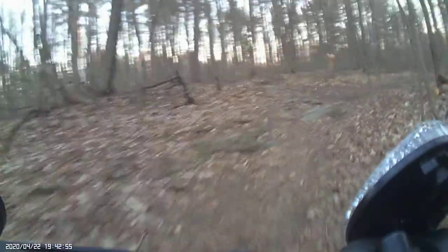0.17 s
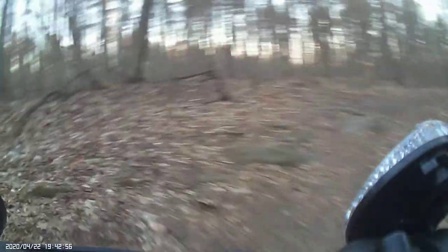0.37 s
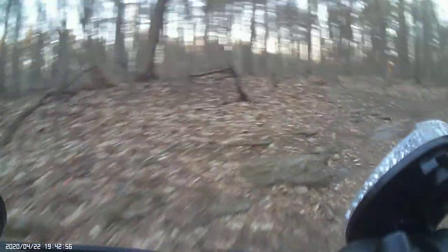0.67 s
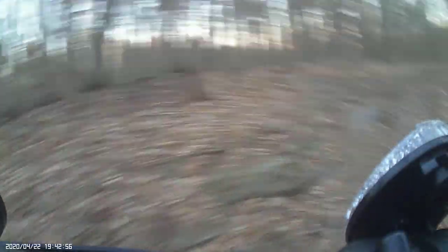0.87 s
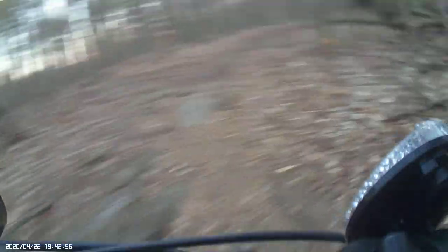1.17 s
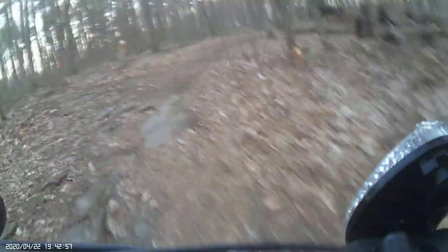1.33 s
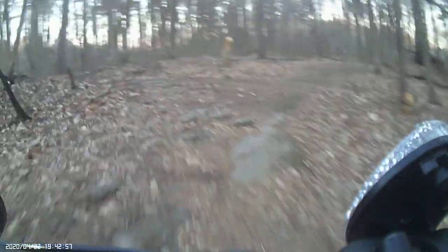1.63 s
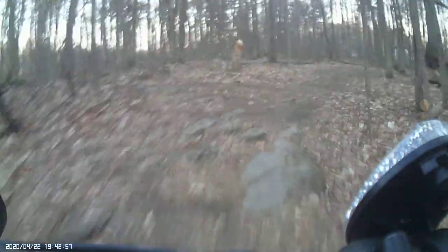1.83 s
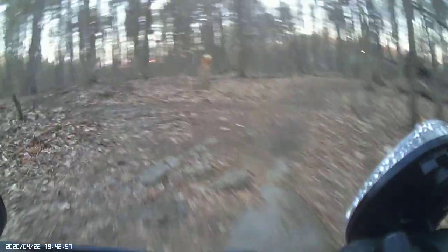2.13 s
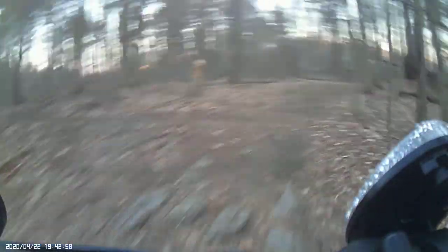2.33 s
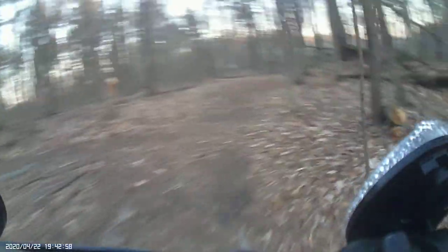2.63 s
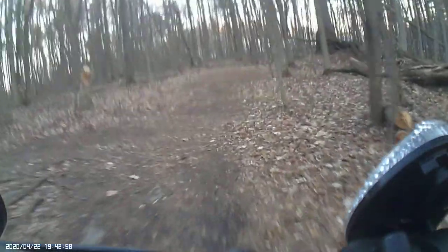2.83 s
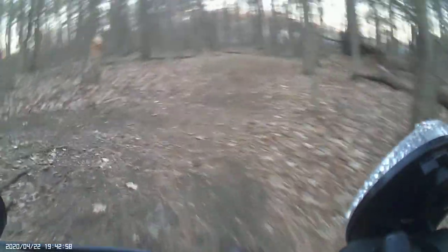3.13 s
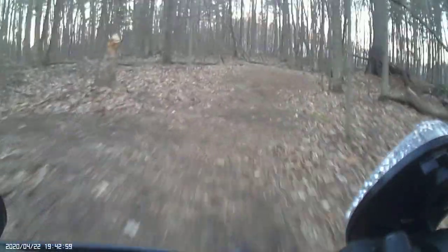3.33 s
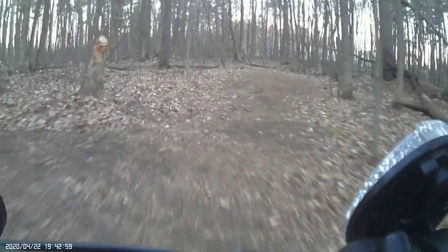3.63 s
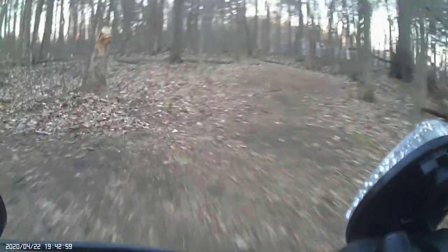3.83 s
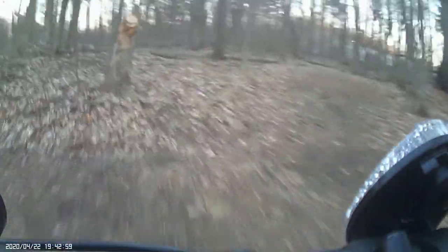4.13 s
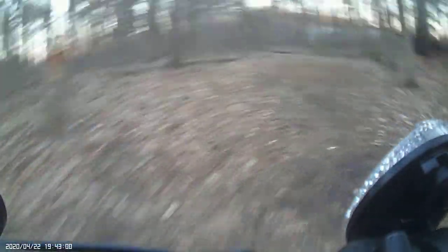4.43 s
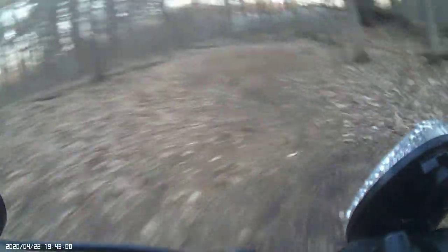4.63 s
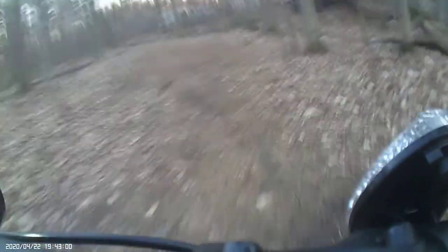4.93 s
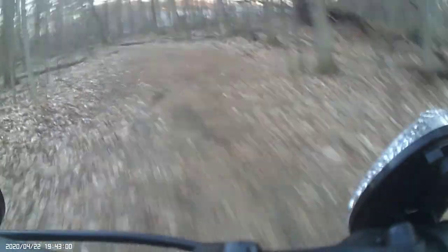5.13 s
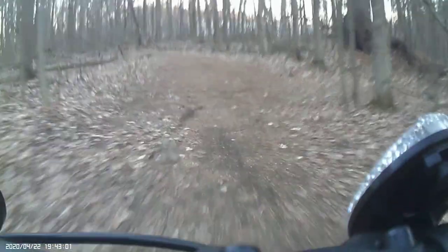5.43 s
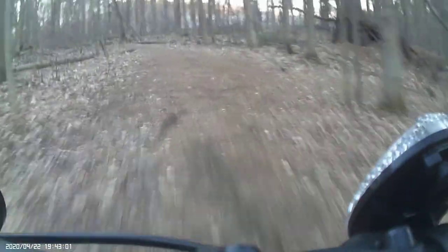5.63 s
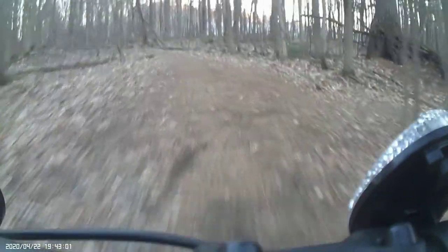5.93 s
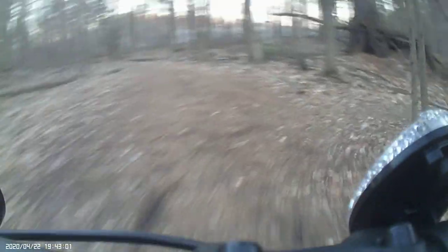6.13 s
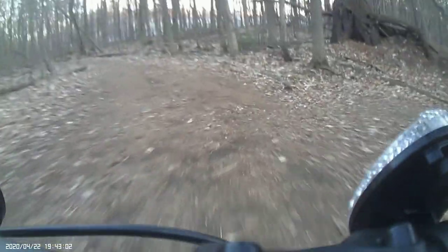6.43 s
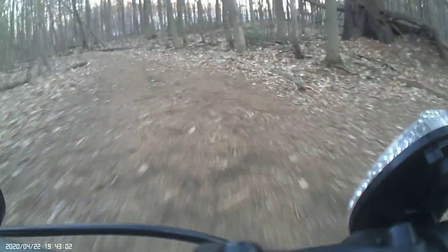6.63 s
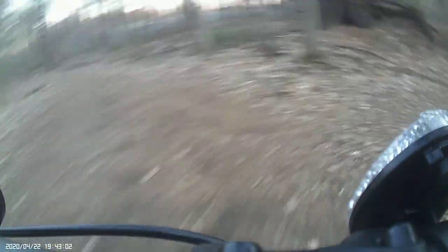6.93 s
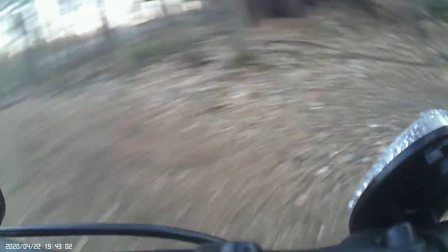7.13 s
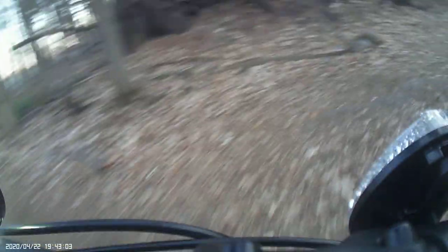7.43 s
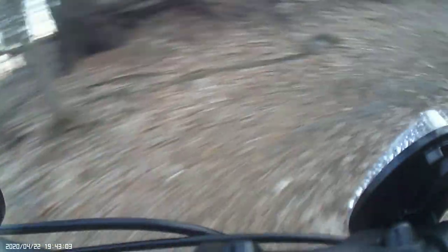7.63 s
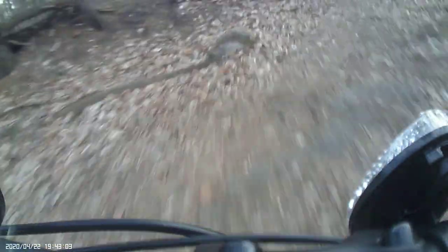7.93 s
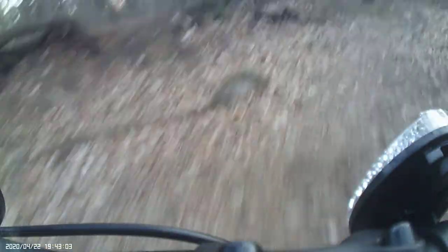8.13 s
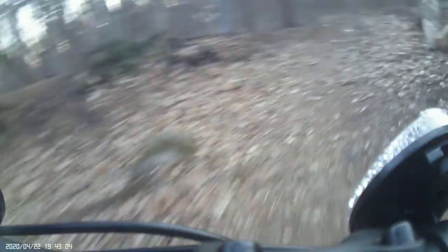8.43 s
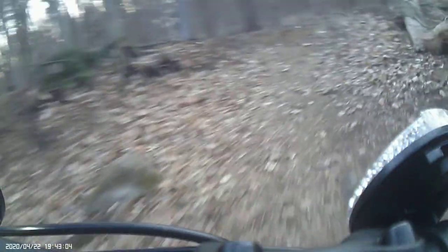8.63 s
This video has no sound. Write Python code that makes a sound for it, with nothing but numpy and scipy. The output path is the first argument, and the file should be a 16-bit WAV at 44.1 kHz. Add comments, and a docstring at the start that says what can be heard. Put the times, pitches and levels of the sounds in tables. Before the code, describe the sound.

A mountain bike rattles down a rough leafy trail, with low rumble, clacks and thumps, then brake groans, squeals and freewheel clicks.

```python
"""A drumming rush and low rumble under clacks, ticks and thumps: a mountain bike on a rough, leafy trail.
It is heard from a camera on the handlebar. Shaped noise makes the wind, tyres and grit; bursts ring modes
for the loose parts, chain and pings; damped swings make the thumps of stones and roots.
A joint squeaks early on. Later the freewheel clicks and a disc brake scrapes, groans, hums and squeals:
timed noise bursts click, grains scrape, wandering sines groan, gliding sines squeak and squeal."""
import sys
import numpy as np
from scipy import signal
from scipy.fft import rfft, irfft, next_fast_len
from scipy.io import wavfile
from scipy.ndimage import uniform_filter1d, map_coordinates

SR = 44100
rng = np.random.default_rng(int(sys.argv[2]) if len(sys.argv) > 2 else 0)


def log_audio(samples):
    """Write samples as a 16-bit WAV file to the path given in sys.argv[1]."""
    # one column per channel
    frames = np.atleast_2d(samples).T
    # limit to full scale, then quantise
    limited = np.clip(frames, -1, 1)
    pcm = np.round(limited * 32767).astype(np.int16)
    wavfile.write(sys.argv[1], SR, pcm)


N = 387638
TIME = np.arange(N) / SR  # seconds, whole scene
HIT = np.arange(SR // 5) / SR  # seconds, one hit
TOP_HZ = 15850  # upper band limit
MOUNT_HZ = 65  # the mount's resonance, also the highest rebound pitch of a bump


def amp(db):
    """Logarithmic level: decibels to gain."""
    return 10 ** (np.asarray(db) / 20)


def unit(x):
    """Power normalisation: x at rms 1."""
    return x / np.sqrt(np.mean(x ** 2) + 1e-20)


def crest(x):
    """Short-time power normalisation: the loudest 3 ms of a hit have rms 1."""
    power = uniform_filter1d(x ** 2, size=132)
    return x / np.sqrt(power.max() + 1e-20)


def peaked(x):
    """Peak normalisation: a hit scaled to peak 1."""
    return x / np.abs(x).max()


def curves(rows):
    """Linear interpolation in time: one value per sample for each column after the first."""
    s, *columns = np.transpose(rows)
    return [np.interp(TIME, s, column) for column in columns]


def during(rows):
    """Gating: a soft-edged window over the time that a table spans."""
    inside = (TIME > rows[0][0]) & (TIME < rows[-1][0])
    return uniform_filter1d(1. * inside, size=256)


def wobble(rate):
    """Slow random modulation: a smooth curve through rate random knots a second."""
    knots = rng.standard_normal(N // 20)
    return map_coordinates(knots, [TIME * rate], order=3, mode="wrap")


def filtered(x, response):
    """Linear filtering: the spectrum of x times a response of frequency."""
    m = next_fast_len(len(x) + 8192)
    spectrum = rfft(x, m) * response(np.fft.rfftfreq(m, 1 / SR))
    return irfft(spectrum, m)[:len(x)]


def colour(points):
    """Spectral envelope: the response through (Hz, dB) points on a log axis."""
    f, db = np.transpose(points)
    return lambda hz: amp(np.interp(np.log(hz + 1), np.log(f), db))


def modes(rows):
    """Modal superposition: the causal response of (Hz, width Hz, dB) resonances."""
    return lambda f: sum(amp(db) * 1j * f * w / (c * c - f * f + 1j * f * w) for c, w, db in rows)


def noise(response):
    """Filtered random excitation: coloured noise of rms 1."""
    return unit(filtered(rng.standard_normal(N), response))


def burst(t60):
    """Exponential decay: a chattering contact as noise that falls 60 dB in t60 seconds."""
    return rng.standard_normal(len(HIT)) * amp(-60 * HIT / t60)


def band(x, lo_hz, hi_hz):
    """Band limitation: a causal band-pass."""
    edges = [lo_hz, min(hi_hz, SR / 2 - 1)]
    return signal.sosfilt(signal.butter(3, edges, "band", fs=SR, output="sos"), x)


def add(track, s, sound):
    """Linear superposition: mix a sound into the track at s seconds."""
    part = track[max(round(s * SR), 0):][:len(sound)]
    part += sound[:len(part)]


def grains(rate, spread_db):
    """Random impact train: tiny impacts of uneven size, on average rate a second, rms 1."""
    struck = rng.random(N) < rate / SR
    size = rng.standard_normal(N) * amp(spread_db * rng.standard_normal(N))
    return unit(struck * size)


def sway(hz, drift_hz, rate, flutter_db):
    """Unevenly driven resonance: a sine whose pitch and size wander, rms 1."""
    phase = 2 * np.pi * np.cumsum(hz + drift_hz * wobble(rate)) / SR
    return unit(np.sin(phase) * amp(flutter_db * wobble(rate)))


# Wind on the case. Each row: time in seconds, level in dB before the gusts.
WIND_LEVEL = [(0, -29), (1, -35), (1.8, -32.5), (2.3, -29.5), (2.9, -27.5), (3.8, -27), (4.1, -23),
              (5.3, -20.5), (5.5, -27.5), (6, -24.5), (6.3, -31), (7.9, -37), (8.25, -24), (8.52, -44),
              (8.79, -29)]
# Spectrum of the wind. Each row: frequency in Hz, relative level in dB.
WIND_SPECTRUM = [(6, -14.5), (15, 5.5), (27, 2.5), (45, 3.5), (90, -13.5), (170, -28), (400, -21),
                 (1000, -120)]
# The camera shaking on its mount. Each row: time in seconds, level in dB before the swells.
SHAKE_LEVEL = [(0, -25), (.16, -36), (.42, -18), (.64, -48), (.92, -27), (1.45, -28), (1.66, -22.5),
               (2.06, -32), (2.2, -16.5), (2.37, -35), (2.47, -20.5), (2.92, -22), (3.65, -27.5),
               (3.95, -26), (4.08, -35), (4.21, -22.5), (4.53, -21), (5.42, -23), (5.54, -38),
               (5.68, -24.5), (6.17, -20.5), (6.26, -26.5), (6.85, -33.5), (6.95, -22), (7.4, -34),
               (7.62, -23.5), (7.95, -35.5), (8.3, -26.5), (8.79, -30)]


def rumble():
    """Turbulence and resonance: gusts buffet the case while the camera shakes on its springy mount."""
    gust_db = 3.5 * wobble(7.4)
    wind = amp(curves(WIND_LEVEL)[0] + gust_db) * noise(colour(WIND_SPECTRUM))
    swell_db = 0.66 * wobble(7.9)
    shake = sway(MOUNT_HZ, drift_hz=4.015, rate=22, flutter_db=3.5)
    return wind + amp(curves(SHAKE_LEVEL)[0] + swell_db) * shake


# Whine of the camera electronics. Each row: frequency in Hz, level in dB.
WHINE_TONES = [(7720, -85.5), (7782, -85.5), (7843, -63), (7903, -75), (7962, -77)]


def electronics():
    """Narrow-band tones over broadband noise: a thin steady whine and a faint hiss."""
    whine = sum(amp(db) * sway(hz, drift_hz=2.5, rate=15.0, flutter_db=1.5) for hz, db in WHINE_TONES)
    hiss = noise(colour([(1000, -4.5), (8800, -9.0), (10000, -7.5), (15500, -16.0)]))
    return whine + amp(-72.5) * hiss


# Tyres on the trail. Each row: time in seconds, tyre roll in dB, grit and leaves in dB,
# both before the weights of their parts.
ROLL_LEVEL = [(0, -31, -46.5), (.2, -37.5, -53), (.7, -39, -54), (.95, -37, -53.5), (1.27, -36.5, -56.5),
              (1.47, -34.5, -52), (1.85, -35, -51.5), (2.5, -33.5, -51.5), (3, -34.5, -52), (4.5, -34, -50),
              (4.95, -32.5, -49.5), (5.5, -31.5, -45), (6.05, -30.5, -54), (6.45, -26.5, -53),
              (6.6, -35, -53), (7.3, -30, -48.5), (7.8, -34.5, -53.5), (8.35, -31.5, -50),
              (8.6, -33.5, -51.5)]
# Spectrum of the rolling rush. Each row: frequency in Hz, relative level in dB.
ROLL_SPECTRUM = [(60, -35.5), (110, -45.5), (200, -27), (260, -21.5), (318, 7.5), (385, -26.5), (435, -5),
                 (465, -11.5), (570, 7), (770, -13.5), (920, -14), (1180, -15.5), (1860, -17), (2100, -28),
                 (4000, -61.5)]
# Spectrum of grit and leaves. Each row: frequency in Hz, relative level in dB.
GRIT_SPECTRUM = [(900, -44), (2000, 0.5), (2900, -2), (3500, 2.5), (5000, -20.5), (7000, -14),
                 (9000, -14.5), (10000, -31.5), (15500, -25.5)]
# Pebbles under the tread. Each row: time in seconds, level in dB relative to the roll.
PATTER_LEVEL = [(0, -4.5), (2, -6.5), (5.3, -11), (6.1, -17.5), (8.1, -6), (8.79, -19)]
# Modes of handlebar and camera case. Each row: frequency in Hz, width in Hz, relative level in dB.
BAR_MODES = [(305, 27, -22), (563.7, 47, 21), (835, 74, 9.5), (933, 316, 5), (1293, 116, 3), (1625, 124, 5),
             (1870, 39, -26.5), (2470, 510, -12.5), (2914, 220, 1.5), (3280, 110, -26), (3820, 180, -39),
             (4473, 147, -4), (4750, 89, -4.5), (5650, 210, -16.5), (6880, 400, -13), (7350, 400, -24)]


def tyres():
    """Structure-borne rolling noise: knobs and soil drum, pebbles patter, grit and dry leaves crackle."""
    roll_db, grit_db = curves(ROLL_LEVEL)
    lump_db = 2.0 * wobble(25)  # uneven soil, shared by the drumming and the grit
    pebbles = filtered(grains(rate=110, spread_db=3.0), modes(BAR_MODES[1:7]))
    patter = amp(curves(PATTER_LEVEL)[0]) * unit(band(pebbles, 390, 1650))
    rush = amp(1.0) * noise(colour(ROLL_SPECTRUM))
    roll = amp(roll_db + lump_db) * (patter + rush)
    crackle = grains(rate=450, spread_db=3.5) + amp(-9.5) * rng.standard_normal(N)
    ringing = unit(band(filtered(crackle, modes(BAR_MODES[7:])), 1600, 7600))
    grit = amp(-6.0) * ringing + amp(-6.0) * noise(colour(GRIT_SPECTRUM))
    return roll + amp(grit_db + lump_db) * grit


# The loose part's own ring. Each row: frequency in Hz, width in Hz, relative level in dB.
LOOSE_PART_MODE = [(1610, 190, 2)]


def clack(middle_db, ring_db, sharp_db):
    """Modal excitation by impact: a hard contact rings the low, middle and high modes of bar and case."""
    shift = 1 + 0.032 * rng.standard_normal(len(BAR_MODES))  # the modes scatter from blow to blow
    body = [(hz * k, width, level) for (hz, width, level), k in zip(BAR_MODES, shift)]
    contact = burst(0.0084) + amp(-1.5) * burst(0.035)  # one blow, then a short buzz
    rebound_s = 0.011 * rng.uniform(0.286, 1.0)  # the part falls back once, softer
    add(contact, rebound_s, amp(-17) * burst(0.0061))
    shudder = contact + amp(-13) * burst(0.11)  # the bar shudders on
    ring = crest(band(filtered(shudder, modes(body[1:3])), 428, 1110))
    middle_modes = modes([*body[2:7], *LOOSE_PART_MODE])
    middle = peaked(band(filtered(contact, middle_modes), 753, 1583))
    edge_modes = modes([*body[7:], (2200, 450, -1)])
    edge = crest(band(filtered(burst(0.019), edge_modes), 2100, 6100))
    return amp(ring_db - 1.5) * ring + amp(middle_db - 1.98) * middle + amp(sharp_db) * edge


# Loose parts striking the bar. Each row: start in seconds, middle modes in dB and low ring in dB
# (both before a small trim), high modes in dB.
CLACK_BLOWS = [(0.389, -20, -42, -51), (0.565, -26, -35.5, -46), (0.74, -37, -40, -51),
               (0.867, -16.5, -27, -38), (0.911, -20, -23, -51), (0.941, -16, -29, -41),
               (1.597, -17.5, -45, -59), (1.814, -10.5, -15, -33.5), (1.9742, -8, -21.5, -28),
               (2.008, -9.5, -18.5, -25), (2.048, -14, -31, -39), (2.116, -15.5, -33, -43),
               (2.1663, -11, -27.5, -35), (2.213, -18, -31, -44), (2.359, -23, -38, -38.5),
               (2.431, -16.5, -19.5, -38.5), (2.473, -13.5, -29, -39), (2.485, -11, -29, -37),
               (2.491, -15.5, -17, -26.5), (2.547, -5, -18, -26.5), (2.574, -9, -17.5, -27.5),
               (2.605, -19.5, -28, -56), (2.647, -17, -30, -56), (2.684, -19.5, -40, -42),
               (2.724, -18.5, -32, -44), (2.831, -21, -22, -47), (2.958, -17, -27, -57),
               (3.057, -12.5, -20.5, -38), (3.109, -14, -26, -42), (3.229, -12.5, -18, -38),
               (3.281, -14, -24, -43), (3.58, -21.5, -30, -41), (3.829, -24.5, -27, -35),
               (3.951, -15, -22, -36), (3.968, -13, -24, -54), (3.998, -15, -17.5, -32),
               (4.011, -8.5, -21, -39), (4.057, -12.5, -19.5, -29.5), (4.112, -14.5, -26, -33),
               (4.16, -17, -20.5, -39), (4.214, -17, -17.5, -47), (4.357, -10.5, -36, -35.5),
               (4.388, -15.5, -39, -41), (4.408, -28, -38, -41), (4.445, -10, -23, -29),
               (4.503, -22, -19, -39), (4.578, -9.5, -46, -39), (4.634, -6.5, -47, -31),
               (4.677, -10.5, -20.5, -34), (4.7, -14, -30, -36), (4.712, -17, -17, -55),
               (4.806, -25, -43, -52), (4.847, -7.5, -20, -24), (4.857, -14, -15, -40),
               (4.866, -21, -38, -26), (4.8997, -5, -14, -25.5), (4.909, -7, -14.5, -27),
               (4.916, -7, -11, -28), (4.932, -16, -21, -31), (4.941, -15, -27, -35), (4.966, -7, -21, -19),
               (4.976, -13, -16.5, -36), (5.03, -13, -27, -34), (5.092, -9, -23.5, -30),
               (5.102, -15.5, -28, -38), (5.135, -10.5, -15.5, -21.5), (5.146, -16, -11, -48),
               (5.181, -10.5, -23, -28), (5.187, -20, -26, -50), (5.198, -22, -30, -28),
               (5.208, -22, -15.5, -38), (5.216, -11, -14, -23.5), (5.25, -4, -15.5, -19.5),
               (5.297, -19, -25, -49), (5.312, -39, -42, -32.5), (5.578, -20.5, -13.5, -40),
               (5.623, -25, -31, -48), (5.638, -19, -38, -31), (5.662, -11, -24, -25.5),
               (5.678, -18, -19, -39), (5.714, -9, -15, -27), (5.725, -13, -27, -29),
               (5.736, -29, -20, -51), (5.807, -19.5, -19.5, -34), (5.89, -17.5, -19, -39),
               (6.088, -15, -30, -34), (6.145, -22, -27, -34), (7.009, -23.5, -33, -35),
               (7.386, -23, -35, -44), (8.301, -18.5, -19, -39.5), (8.325, -10, -22.5, -34),
               (8.342, -10, -21, -25), (8.4, -18, -32, -43), (8.426, -6.5, -16, -21)]
# Rattle of chain and loose parts on rough ground. Each row: time in seconds, reference level in dB.
RATTLE_LEVEL = [(0, -56), (.8, -83), (1.25, -77), (2, -62), (3.5, -59.5), (4.8, -52), (5.3, -56),
                (5.45, -68), (5.9, -66), (6.3, -59), (7.5, -72), (8.1, -67), (8.79, -69)]


def clacks():
    """Repeated impact: loose parts strike the bar; small clacks come at random on rough ground."""
    out = np.zeros(N)
    for s, middle_db, ring_db, sharp_db in CLACK_BLOWS:
        add(out, s, clack(middle_db, ring_db, sharp_db))
    contacts = signal.fftconvolve(grains(rate=20, spread_db=0.5), burst(0.048))[:N]
    small = unit(band(filtered(contacts, modes(BAR_MODES[1:7])), 600, 1900))
    return out + amp(curves(RATTLE_LEVEL)[0] + 8) * small


def tick():
    """Clustered impacts: a few chain links land one after another, at a scattered pitch; peak 1."""
    hz = 5730 * np.exp(0.17 * rng.standard_normal())
    links = burst(0.019) * (1 - np.exp(-HIT / 0.00053))
    return peaked(band(filtered(links, modes([(hz, 1200, 0)])), 2700, 8400))


# Further slaps of the chain on the frame. Each row: start in seconds, peak in dB before the sizzle.
CHAIN_SLAPS = [(0.2009, -34.5), (0.2438, -44), (0.5197, -35.5), (1.1014, -43), (1.488, -46), (1.7519, -47),
               (1.813, -39), (1.863, -36), (1.9111, -31.5), (1.974, -40), (1.995, -32), (2.0073, -25),
               (2.289, -39), (2.5222, -27.5), (2.697, -39.5), (2.752, -36), (2.767, -37.5), (2.779, -32.5),
               (2.9147, -28.5), (3.19, -33), (3.2495, -27), (3.651, -41), (3.83, -39.5), (3.939, -29),
               (3.981, -28), (4.129, -37), (4.305, -33.5), (4.353, -30), (4.379, -28.5), (4.541, -35),
               (4.597, -28.5), (4.723, -31), (4.768, -25.5), (4.808, -32), (4.8281, -26.5), (4.86, -28),
               (4.9154, -22.5), (4.967, -26), (5.064, -28.5), (5.1716, -30), (5.199, -35), (5.228, -20.5),
               (5.26, -24.5), (5.2834, -27), (5.3113, -24), (5.325, -29), (5.6261, -28), (5.672, -26),
               (5.6865, -25.5), (5.729, -27.5), (5.951, -28), (6.021, -33), (6.04, -28.5), (8.269, -32),
               (8.3543, -28.5), (8.72, -42), (8.7605, -39), (8.7804, -37)]


def chain():
    """Impact brightening: bumps flick the chain, harder slaps sizzle more, small ticks come at random."""
    out = np.zeros(N)
    # each flick follows its bump by 7.7 ms and grows 2.04 dB per dB of bump
    flicks = [(s + 0.0077, -20.5 + 2.04 * (db - HARD_BUMP_DB)) for s, db, _ in BUMP_HITS]
    for s, db in flicks + list(CHAIN_SLAPS):
        top = colour([(5000, -25), (8500, 0.0), (11000, -5.5), (15500, -13.0)])
        sizzle = crest(filtered(burst(0.007), top))
        sizzle_db = -45.5 + 2.6 * (db + 22.5)  # grows 2.6 dB per dB of slap
        add(out, s, amp(db) * tick() + amp(sizzle_db) * sizzle)
    rattle_db, = curves(RATTLE_LEVEL)
    ticks_per_s = 24
    for i in np.flatnonzero(rng.random(N) < ticks_per_s / SR):
        tick_db = rattle_db[i] + 12.5 + 5.5 * rng.standard_normal()
        add(out, i / SR, amp(tick_db) * tick())
    return out


# Small hard bits pinging off metal. Each row: start in seconds, level in dB.
PING_HITS = [(0.148, -54), (1.561, -50), (5.868, -56.5), (6.055, -56)]
# Very high metal modes. Each row: frequency in Hz, width in Hz, relative level in dB.
METAL_MODES = [(9540, 200, -4), (11300, 300, -4.5), (11800, 91, 0.5), (14990, 110, -1.5)]


def pings():
    """High-mode excitation: tiny hard contacts ring a few very high metal modes."""
    out = np.zeros(N)
    for s, db in PING_HITS:
        ping = band(filtered(burst(.03), modes(METAL_MODES)), 8800, 15800)
        add(out, s, amp(db) * crest(ping))
    return out


# Squeaks of a joint early on, then hums and squeals of the disc. Each row: time of the peak in seconds,
# rise and fall in seconds each, frequency at the peak in Hz, glide in Hz per second,
# level in dB before the flutter.
SQUEAL_TONES = [(.67, .11, 883, 220, -40), (3.485, .04, 1300, -500, -40), (3.514, .035, 1350, 900, -35),
                (6.3, .04, 13555, 0, -60), (6.474, .012, 11270, -3000, -18.5),
                (6.48, .03, 11400, 4000, -41), (6.734, .06, 896, 102, -28), (7.16, .06, 7553, -2500, -51),
                (7.08, .11, 1835, 0, -43), (7.285, .05, 920, 0, -39), (7.55, .15, 1850, 0, -41),
                (8.075, .1, 925, 0, -38), (7.463, .04, 6350, -2000, -38), (7.49, .014, 6200, -7000, -24),
                (7.503, .013, 6100, -4000, -34), (7.506, .02, 6400, 0, -36), (7.567, .042, 6365, -700, -27),
                (7.619, .014, 6230, -14000, -42), (8.087, .022, 6390, 500, -24),
                (8.108, .013, 6440, 0, -20), (8.148, .045, 6418, 300, -23), (8.176, .024, 6435, -300, -18),
                (8.212, .042, 6415, 0, -30), (8.315, .035, 7560, -3000, -49)]


def squeals():
    """Stick-slip oscillation: tones swell and fade as they glide, some in short neighbouring pieces."""
    out = np.zeros(N)
    waver, flutter_db = 1 + 0.0018 * wobble(300), 1.8 * wobble(120)
    fade_db = 34  # depth of the bell-shaped fade, which then drops to silence
    for s, half_s, hz, glide, db in SQUEAL_TONES:
        on = np.abs(TIME - s) < half_s
        t = TIME[on] - s
        phase = 2 * np.pi * np.cumsum((hz + glide * t) * waver[on]) / SR
        octave = (2 * hz < TOP_HZ) * np.sin(2 * phase)
        tone = np.sin(phase) + amp(-45) * octave
        swell = amp(-fade_db * (t / half_s) ** 2) - amp(-fade_db)
        out[on] += amp(db + flutter_db[on]) * swell * tone
    return out


HARD_BUMP_DB = -4.5  # reference strength of a hard bump
# Wheels striking stones and roots. Each row: start in seconds, peak of the shove in dB, knock in dB.
BUMP_HITS = [(1.808, -8.5, -23.5), (1.894, -20.5, -23), (1.941, -12, -22), (2.43, -30, -29),
             (2.475, -29, -20.5), (2.896, -22, -31), (3.053, -13, -27.5), (3.225, -22.5, -16.5),
             (3.248, -13.5, -27), (3.847, -30, -28), (3.946, -6.5, -22), (4.212, -19.5, -22),
             (4.267, -17.5, -26.5), (4.352, -15, -23.5), (4.771, -17.5, -19.5), (4.843, -3, -12),
             (4.867, -17, -14.5), (4.88, -4.5, -31), (4.908, -22.5, -17.5), (5.197, -19, -16),
             (5.214, -5, -13), (5.248, -19, -22), (5.269, -7.5, -29), (5.311, -14, -21),
             (5.571, -22.5, -20), (5.62, -20.5, -16.5), (5.652, -3.5, -22), (5.682, -22, -23.5),
             (5.929, -29, -26), (6.022, -14, -26), (8.139, -24.5, -24), (8.294, -8.5, -20),
             (8.321, -13, -27), (8.642, -41, -23.5)]


def bumps():
    """Damped oscillation: each blow shoves the bike into a decaying swing, with a dull knock."""
    out = np.zeros(N)
    for s, db, knock_db in BUMP_HITS:
        # harder bumps rebound more slowly: an octave for every 13 dB
        hz = min(20.4 * 2 ** ((HARD_BUMP_DB - db) / 13), MOUNT_HZ)
        # the first blow is quicker: 0.31 of a cycle extra, settling over 8.8 ms
        cycles = hz * HIT + 0.31 * (1 - np.exp(-HIT / 0.0088))
        envelope = amp(-60 * HIT / 0.18) * (1 - np.exp(-HIT / 0.0041))
        shove = peaked(np.sin(2 * np.pi * cycles) * envelope)
        contact = burst(0.045) + amp(-6.5) * burst(0.13)  # the blow, then a short shudder
        knock = filtered(contact, modes([(126, 290, -1.5), (275, 64, -1.5), (520, 59, -22)]))
        add(out, s, amp(knock_db) * crest(band(knock, 90, 740)) - amp(db) * shove)
    return out


# Running count of pawl drops. Each row: time in seconds, clicks so far.
PAWL_COUNT = [(5.36, 0), (5.79, 8), (5.982, 12), (6.416, 20), (6.54, 22), (6.794, 26), (7.403, 36),
              (7.611, 39), (7.952, 44), (8.059, 46), (8.266, 50), (8.513, 54), (8.82, 58)]
# Loudness of the pawl clicks. Each row: time in seconds, level in dB before a random scatter.
PAWL_LEVEL = [(5.4, -50), (5.8, -49), (6.55, -49), (6.95, -48), (7.35, -51.5), (7.75, -50), (8.3, -49),
              (8.79, -49)]


def freewheel():
    """Ratchet impacts: pawls drop over the teeth at the pace of the coasting rear wheel."""
    teeth, db = np.floor(curves(PAWL_COUNT)[0]), curves(PAWL_LEVEL)[0]
    out = np.zeros(N)
    for i in np.flatnonzero(np.diff(teeth)):
        ratchet = modes([(7040, 330, 38), (7880, 220, 40), (8700, 500, 14), (10200, 500, 6.7)])
        click = crest(band(filtered(burst(0.031), ratchet), 6000, 10500))
        add(out, i / SR, amp(db[i] + rng.normal(0, 1.8)) * click)
    return out


# Pads scraping the disc. Each row: time in seconds, level in dB before the random wobble.
RUB_LEVEL = [(5.85, -37.5), (6.1, -28.5), (6.2, -25), (6.33, -23), (6.59, -28), (6.62, -36.5), (7.0, -45),
             (7.07, -25), (7.18, -28), (7.27, -46), (7.32, -58), (7.4, -33), (7.55, -33.5), (7.7, -41),
             (8.05, -35.5), (8.3, -30.5), (8.45, -45)]
# Spectrum of the scrape. Each row: frequency in Hz, relative level in dB.
RUB_SPECTRUM = [(150, -25), (215, -19), (320, -15), (420, 9.5), (550, 14.5), (750, -0.5), (1200, -4),
                (1900, -13.5), (2200, -13), (3600, -28), (6000, -23.5), (8200, -21.5), (9000, -33),
                (9700, -46), (11200, -46), (15500, -66.5)]
# Humming modes of the disc. Each row: frequency in Hz, width in Hz, relative level in dB.
HUM_MODES = [(913, 7, 12), (1823, 110, -3.5), (1974, 70, 1), (2500, 43, -9), (2580, 64, -6.5),
             (3100, 120, -14), (4510, 89, -10), (4810, 93, -19)]
# The disc's highest mode. Each row: frequency in Hz, width in Hz, relative level in dB.
SING_MODE = [(11300, 330, -4)]


def brake():
    """Friction excitation: pads scrape the gritty disc and make its modes hum and sing."""
    rub_db, = curves(RUB_LEVEL)
    scrape = unit(filtered(grains(rate=2400, spread_db=2.0), colour(RUB_SPECTRUM)))
    hum = unit(band(noise(modes(HUM_MODES)), 700, 4550))
    hum_db = np.minimum(rub_db - 6, -41.5)  # firm pads damp the hum to this ceiling
    sing = unit(band(noise(modes(SING_MODE)), 10500, 12200))
    sing_db = rub_db - 50 + 3.8 * wobble(22)
    rubbing = amp(rub_db + 3.1 * wobble(40)) * scrape + amp(hum_db) * hum + amp(sing_db) * sing
    return during(RUB_LEVEL) * rubbing


# The two modes of the fork, lower then upper: frequencies in Hz.
FORK_MODES = [320.6, 538.6]
# Groans, one table for each pull of the brake. Each row: time in seconds, lower mode in dB,
# upper mode in dB, both before roughness and overtones.
GROAN_PULLS = [
    [(6.16, -44, -30), (6.183, -21.5, -19.5), (6.225, -14.5, -26), (6.27, -16, -22), (6.293, -23, -13),
     (6.335, -7, -11), (6.365, -27, -23.5), (6.39, -9.5, -12), (6.413, -33, -17), (6.448, -13.5, -7.5),
     (6.5, -28, -23.5), (6.54, -19.5, -34.5), (6.59, -24, -19), (6.62, -45, -45)],
    [(6.72, -56, -46), (6.748, -28, -20.5), (6.82, -43, -71)],
    [(7.03, -50, -48), (7.08, -28, -42), (7.12, -27, -40), (7.138, -22, -22), (7.162, -22, -21),
     (7.175, -31, -49), (7.188, -19, -12.5), (7.205, -12.5, -20.5), (7.26, -43, -40)],
    [(7.98, -36, -42), (8.1, -33.5, -35.5), (8.27, -37, -32), (8.38, -28, -42)],
]


def judder():
    """Self-excited vibration: grabbing pads ring the fork unevenly; squaring lifts overtones when loud."""
    ring = np.zeros(N)
    for groan in GROAN_PULLS:
        for hz, db in zip(FORK_MODES, curves(groan)):
            ring += amp(db) * during(groan) * sway(hz, drift_hz=11.5, rate=75, flutter_db=2.5)
    rough = ring * (1 + 0.15 * wobble(260))
    overtones = band(ring ** 2, 700, 1400)
    return rough + amp(-9.5) * overtones


# Hard ticks as the loud groan overloads the recorder. Each row: start in seconds, level in dB.
OVERLOAD_TICKS = [(6.331, -25.5), (6.337, -31), (6.3416, -35.5), (6.3774, -39), (6.4445, -30),
                  (6.448, -32.5), (6.453, -32), (6.455, -37), (6.545, -34.5)]


def overload_ticks():
    """Overload transients: brief noise bursts at listed times stand for hard ticks in the loud groan."""
    out = np.zeros(N)
    for s, db in OVERLOAD_TICKS:
        tick_sound = filtered(burst(0.015), colour([(500, 0), (2200, 14.5), (6000, -14), (15000, -20)]))
        add(out, s, amp(db) * crest(tick_sound))
    return out


# Peaks and hollows of the closed case around the microphone. Each row: frequency in Hz, width in Hz,
# gain at the centre in dB.
CASE_PEAKS = [(765, 18, 1), (1872, 63, 6.5), (2035, 270, -5), (2560, 62, -4), (2920, 57, -2.5),
              (3227, 120, -18), (3580, 460, -25.5), (3850, 88, 6.5), (4310, 450, -4), (4070, 140, -6),
              (4880, 230, -12), (6450, 430, -4), (6670, 150, 6.5), (7000, 200, -4), (8500, 260, -6.5),
              (9500, 820, -5.5)]


def case(hz):
    """Cascaded resonance: the closed case's peaks and hollows act in turn."""
    stages = [1 + (amp(db) - 1) * modes([(centre, width, 0)])(hz) for centre, width, db in CASE_PEAKS]
    return np.prod(stages, axis=0)


def scene():
    """Superposition: bike and ticks pass the case filter; rumble and electronics join unfiltered."""
    bike = tyres() + clacks() + chain() + pings() + squeals() + bumps() + freewheel() + brake() + judder()
    return (rumble() + electronics() + filtered(bike + overload_ticks(), case))[None]


def record(dry):
    """Band limitation and saturation: the camera blocks slow drift, flattens big peaks, cuts the top."""
    sound = filtered(dry[0], lambda hz: 1j * hz / (1j * hz + 4))  # high-pass at 4 Hz
    held = sound / (1 + np.abs(sound / .71) ** 20) ** (1 / 20)  # peaks held near 0.71
    return filtered(held, lambda hz: hz < TOP_HZ)[None]


dry = scene()
out = record(dry)
log_audio(out)
```